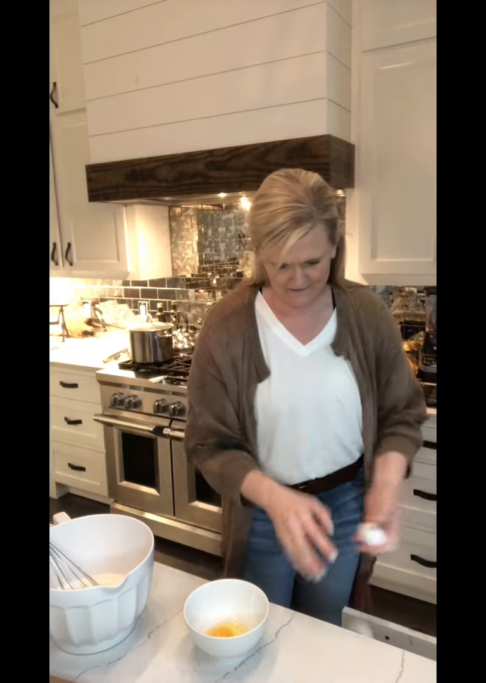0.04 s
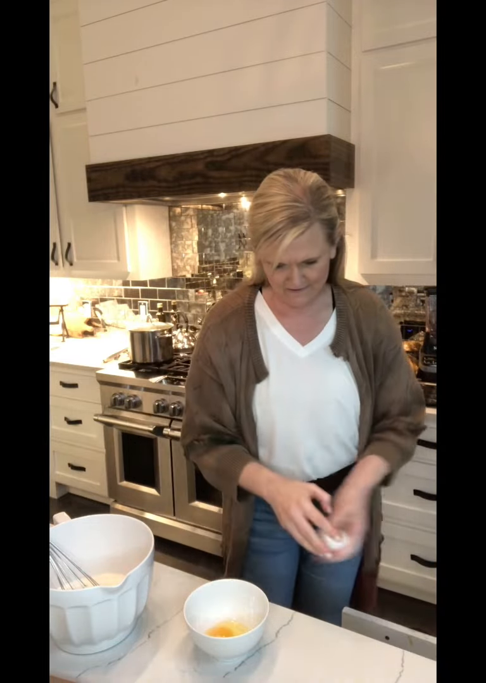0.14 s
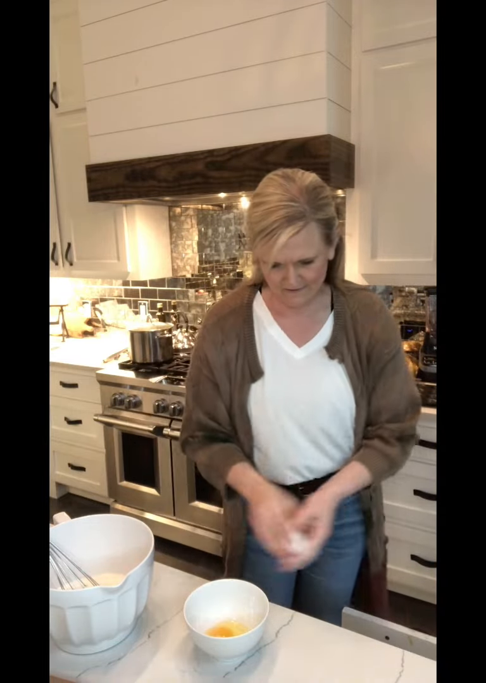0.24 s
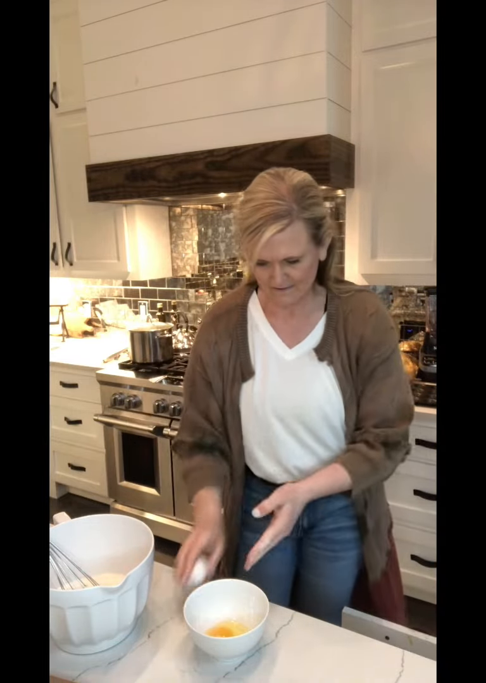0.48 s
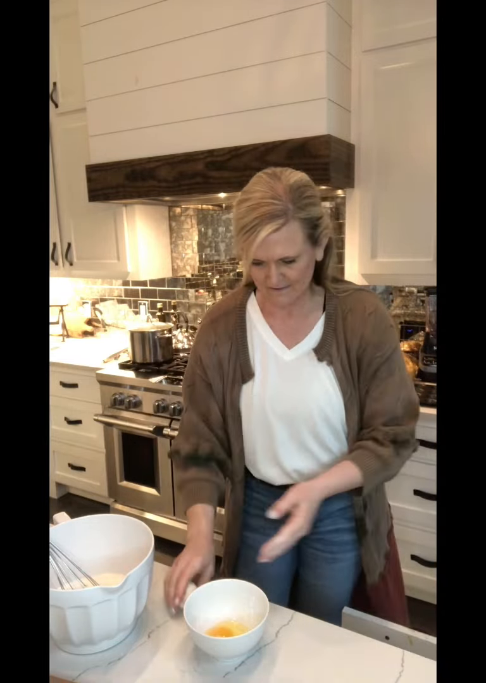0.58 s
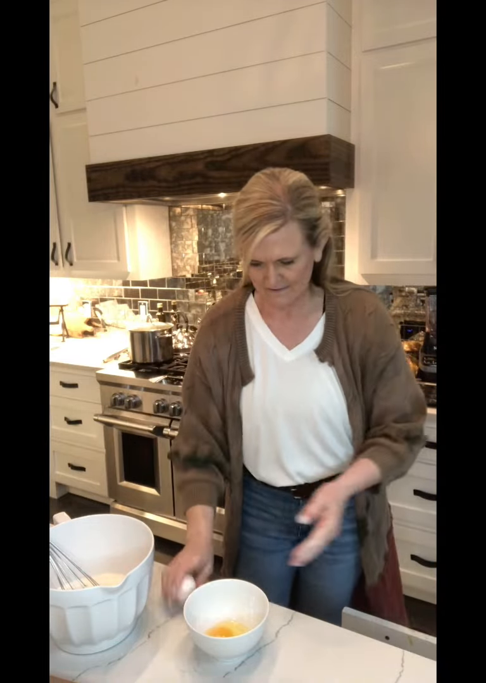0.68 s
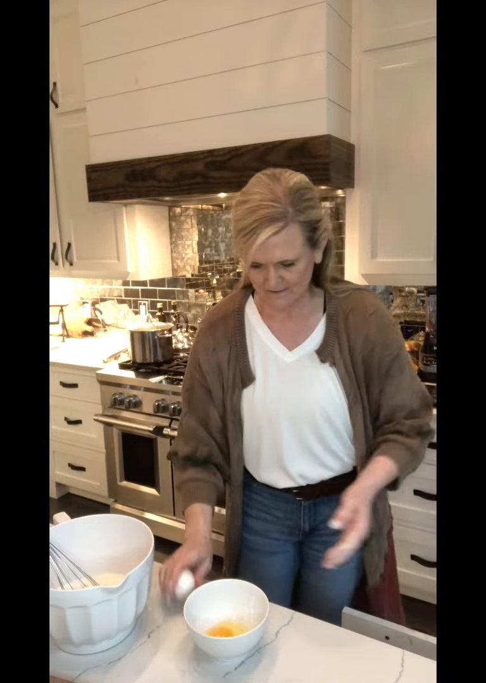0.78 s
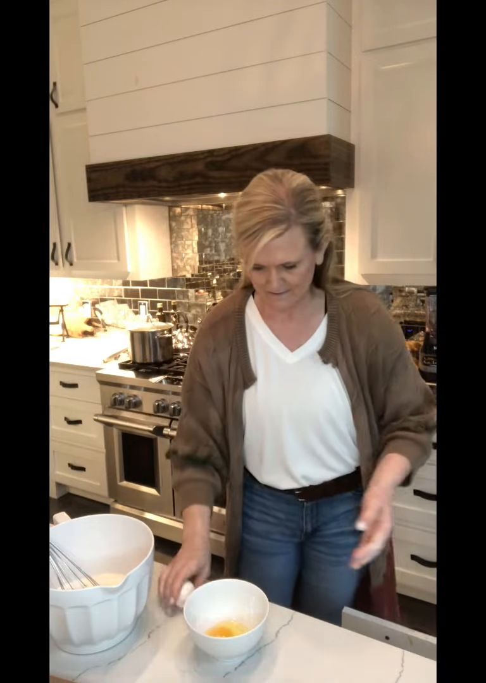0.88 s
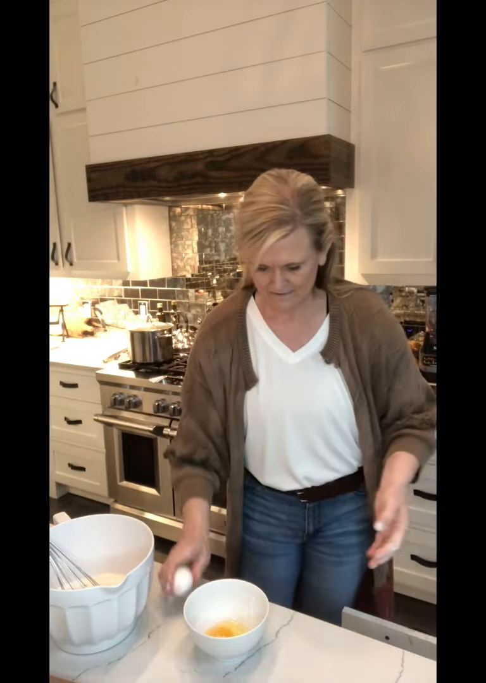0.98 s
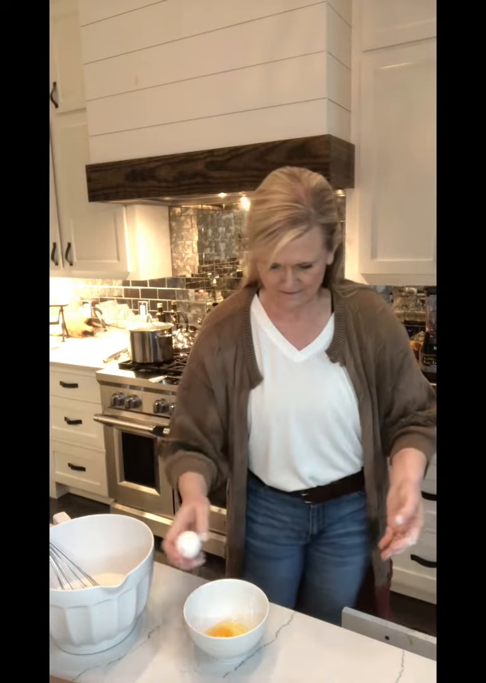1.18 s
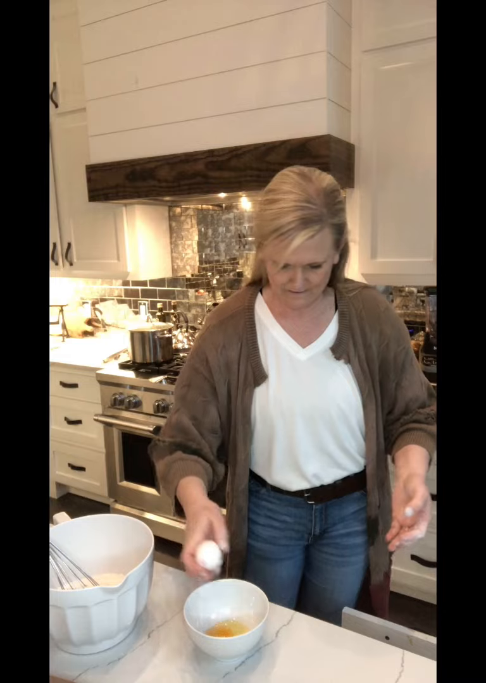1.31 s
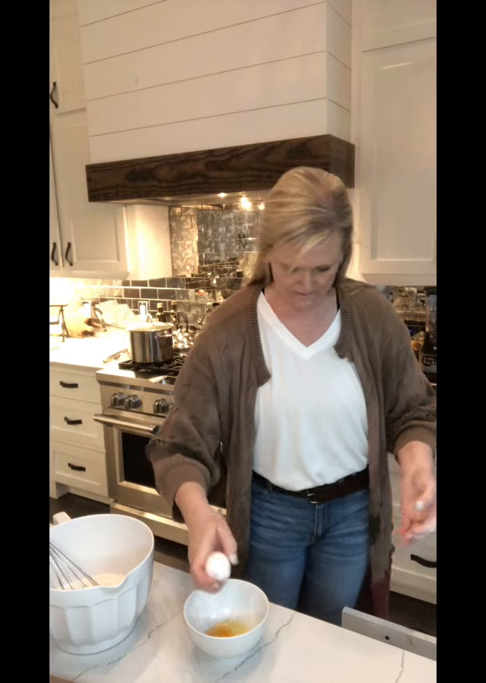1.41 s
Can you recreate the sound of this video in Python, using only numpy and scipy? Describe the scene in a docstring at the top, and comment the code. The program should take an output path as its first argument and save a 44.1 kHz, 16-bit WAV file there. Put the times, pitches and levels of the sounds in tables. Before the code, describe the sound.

An egg slaps into a palm, raps a hard counter, then cracks under two sharper blows

```python
"""An egg slides from one hand into the other with two soft slaps, is knocked once on a kitchen counter
without breaking, then cracks under two sharper blows; the broken shell ticks as it is lifted.
Contacts are brief noise flurries ringing the palm, counter or shell; sliding skin is swelling noise.
Decaying sines make the faint counter boom, and decaying noise the ring of a large, hard kitchen.
A low background rush of coloured noise lies under everything."""
import sys
import numpy as np
from scipy import signal
from scipy.fft import rfft, irfft
from scipy.io import wavfile

SR = 44100
rng = np.random.default_rng(int(sys.argv[2]) if len(sys.argv) > 2 else 0)


def transcribe(signal):
    """Save signal, clipped to [-1, 1], as a 16-bit WAV file at the path in sys.argv[1]."""
    frames = np.atleast_2d(signal).T
    limited = np.clip(frames, -1, 1)
    pcm = np.round(limited * 32767).astype(np.int16)
    wavfile.write(sys.argv[1], SR, pcm)


N = 63945
SIZE = 96000  # samples in every transform, longer than the scene
HZ = np.fft.rfftfreq(SIZE, 1 / SR)
T = np.arange(N) / SR


def amp(db):
    """Decibels to gain."""
    return 10 ** (np.asarray(db) / 20)


def along(points, hz):
    """(frequency, value) points joined by straight lines on a log frequency axis."""
    point_hz, values = np.transpose(points)
    return np.interp(np.log(hz + 1), np.log(point_hz + 1), values)


def filtered(x, response):
    """A sound passed through a frequency response."""
    return irfft(rfft(x, SIZE) * response, SIZE)[:N]


def causal(gain):
    """The minimum-phase response with this gain: its energy comes as early as it can."""
    cepstrum = irfft(np.log(np.maximum(gain, 1e-6)))
    cepstrum[1:SIZE // 2] *= 2
    cepstrum[SIZE // 2 + 1:] = 0
    return np.exp(rfft(cepstrum))


def delay(seconds):
    """Frequency response of a pure delay."""
    return np.exp(-2j * np.pi * HZ * seconds)


def resonances(modes):
    """Gain of a body whose resonances (hz, width_hz, level_db) add in power."""
    skirt = 1.167  # how steeply a resonance falls away from its peak
    power = 0
    for hz, width_hz, level_db in modes:
        damping = (HZ * width_hz) ** 2
        peak = damping / ((hz ** 2 - HZ ** 2) ** 2 + damping)
        power = power + amp(level_db) ** 2 * peak ** skirt
    return np.sqrt(power)


def colour(hollow_db=0, treble_db=0):
    """Gain of two broad bells, each reaching about an octave to either side."""
    hollow_hz, treble_hz = 307, 11800

    def bell(hz):
        return np.exp(-np.log2((HZ + 1) / hz) ** 2)

    return amp(hollow_db * bell(hollow_hz) + treble_db * bell(treble_hz))


def noise(gain):
    """Coloured noise of rms 1."""
    x = filtered(rng.standard_normal(SIZE), gain)
    return x / x.std()


def blurred(gain):
    """A gain evened out over neighbouring pitches, as the room gathers sound from all sides."""
    blur_octaves = .4
    octaves = np.linspace(4, np.log2(SR / 2), 256)
    weights = np.exp(-((octaves[:, None] - octaves) / (blur_octaves / 2)) ** 2)
    power = weights @ np.interp(2 ** octaves, HZ, gain) ** 2 / weights.sum(axis=1)
    return np.sqrt(np.interp(HZ, 2 ** octaves, power))


def contact(start_s, length_s, gain, room_db, build_up_s=1 / SR):
    """A quickly dying flurry of tiny impulses rings a body: (direct sound, sound sent into the room)."""
    smear_s = .002  # widens every contact, added to its length as root of squares
    notch_fill = 0.42  # keeps the flurry's spectrum roughly level without making it ring
    bass_lag_cycles, bass_lag_hz = 0.898, 91.8
    t = T[:SR // 10]
    decay = np.exp(-(t / np.hypot(length_s, smear_s)) ** 2)
    build_up = 1 - np.exp(-(t / build_up_s) ** 2)
    flurry = rng.standard_normal(len(t)) * decay * build_up
    force = rfft(flurry / np.linalg.norm(flurry), SIZE)
    force = force / causal(np.hypot(np.abs(force), notch_fill))
    force = force / np.sqrt(np.mean(np.abs(force) ** 2))
    # low tones build up later: each frequency waits cycles / (hz + lag hz) seconds
    lag = np.exp(-2j * np.pi * bass_lag_cycles * np.log(1 + HZ / bass_lag_hz))
    force = force * lag * delay(start_s)
    direct = causal(gain)
    sent = causal(blurred(gain) * amp(room_db))
    return irfft(force * np.array([direct, sent]))[:, :N]


def kitchen(x):
    """The room's answer: a short burst from near walls and a long diffuse tail, both decaying noise."""
    # how long the tail takes to fall 60 dB: hz, t60_s
    decay_times = [(100, 1.15), (300, 0.68), (1000, 1.24), (4500, 1.1), (8000, 0.76), (14000, .5)]
    # strength of the tail: hz, level_db
    tail_levels = [(100, -15.5), (250, -3), (600, -2.5), (1300, -7), (4500, -7.5), (8000, -9), (14000, -12)]
    tail_delay_s = .007
    early_delay_s, early_t60_s, early_db = .014, 0.035, -13.5
    hz, t, bands = signal.stft(rng.standard_normal(N), SR, nperseg=256)
    t60 = along(decay_times, hz)[:, None]
    level = np.sqrt(np.log(1e6) / (t60 * SR))  # evens the energy of long and short decays
    tail = signal.istft(bands * amp(-60 * t / t60) * level, SR, nperseg=256)[1]
    late = rfft(tail, SIZE) * amp(along(tail_levels, HZ)) * delay(tail_delay_s)
    burst = rng.standard_normal(N) * 1000 ** (-T / early_t60_s)
    burst = burst / np.linalg.norm(burst)
    early = amp(early_db) * rfft(burst, SIZE) * delay(early_delay_s)
    return filtered(x, late + early)


def heard(pair):
    """Direct sound plus the room's answer."""
    direct, sent = pair
    return direct + kitchen(sent)


def background():
    """A steady low rush: noise weighted towards the bass."""
    # spectrum of the rush: hz, relative level_db per Hz
    rush_spectrum = [(25, -13), (50, -11.5), (80, 0), (130, -1.5), (250, 0), (450, -1.5), (800, -8.5),
                     (1500, -15), (3000, -22.5), (8000, -28), (16000, -36)]
    rush_db = -61
    return amp(rush_db) * noise(amp(along(rush_spectrum, HZ)))


def hands():
    """Skin brushes the shell as swelling noise, and the egg slaps into the resonant cupped palm."""
    # egg landing in the palm: start_s, level_db, length_s (before smear), hollow_db, treble_db
    landings = [(0.1543, -6.5, 0.00875, 3.5, -7.5), (0.2161, -0.5, 0.0074, -2.5, -0.5)]
    # cupped hand around the egg: hz, width_hz, level_db
    palm_modes = [(161.3, 16, 20), (233, 21.5, 22.5), (397, 110, 2.5), (640, 360, 6), (1047, 81, 5.5),
                  (1220, 140, 11), (1916, 120, 5), (3980, 340, -4.5), (4780, 600, -6.5), (6170, 1170, -7.5),
                  (12000, 3300, -21)]
    # skin sliding on shell: peak_s, level_db, rise_s, fall_s, treble_db
    rubs = [(0.114, -55, 0.023, 0.025, 3), (0.147, -55, 0.039, 0.085, 8.5),
            (0.224, -49, 0.0018, 0.02, 14.5), (0.27, -56.5, 0.0065, 0.06, 7),
            (1.34, -66.5, 0.0096, 0.012, 23)]
    # spectrum of skin on shell, before each rub's treble: hz, relative level_db per Hz
    skin_spectrum = [(60, -54), (220, 11.5), (500, -10.5), (1600, 1), (2600, -1), (4500, -6.5), (8000, -15),
                     (16000, -35)]
    room_db, build_up_s = 1, .0015  # for the slaps
    palm = resonances(palm_modes)
    pair = np.zeros((2, N))
    for start_s, level_db, length_s, hollow_db, treble_db in landings:
        gain = amp(level_db) * palm * colour(hollow_db, treble_db)
        pair += contact(start_s, length_s, gain, room_db, build_up_s)
    for peak_s, level_db, rise_s, fall_s, treble_db in rubs:
        swell = np.exp(-((T - peak_s) / np.where(T < peak_s, rise_s, fall_s)) ** 2)
        brush = noise(amp(along(skin_spectrum, HZ)) * colour(treble_db=treble_db))
        pair += amp(level_db) * swell * brush  # equally direct and into the room
    return heard(pair)


def knock():
    """The whole egg raps the counter and rings the modes of both."""
    # knock that leaves the shell whole: start_s, level_db, length_s (before smear)
    rap = (.4663, 0, 0.00067)
    # counter and whole egg: hz, width_hz, level_db
    counter_modes = [(184, 68, 7.5), (264, 21, 21), (364, 28, 19.5), (511, 20, 12), (650, 48, 14),
                     (930, 65, 6), (1186, 56, 3.5), (1510, 110, 1), (2420, 20, -6), (4020, 300, -6),
                     (4950, 160, -2.5), (7100, 440, -9.5)]
    # sent into the room, as the counter spreads its low tones widely: hz, level_db
    room_levels = [(200, 1.5), (600, 1), (1200, 0.5), (2500, 1), (5000, -4), (12000, -3.5)]
    start_s, level_db, length_s = rap
    gain = amp(level_db) * resonances(counter_modes)
    return heard(contact(start_s, length_s, gain, along(room_levels, HZ)))


def cabinet():
    """Each blow slowly wakes the low modes under the counter, which decay as sines."""
    # cabinet boom: hz, level_db, t60_s
    boom_modes = [(69.1, 0, 0.66), (77.4, -6, 0.64), (96.6, 0.5, 0.48)]
    # blows that drive it: start_s, level_db
    drives = [(.468, -51.5), (0.615, -56), (0.784, -47.5)]
    rise_s = 0.011
    out = np.zeros(N)
    for start_s, drive_db in drives:
        t = np.maximum(T - start_s, 0)
        rise = 1 - np.exp(-(t / rise_s) ** 2)
        for hz, level_db, t60_s in boom_modes:
            ring = 1000 ** (-t / t60_s) * np.sin(2 * np.pi * hz * t)
            out += amp(drive_db) * amp(level_db) * ring * rise
    return out


def cracks():
    """The shell caves in within a few milliseconds; once dented, it favours other modes."""
    # blows that break the shell: start_s, level_db, length_s (before smear), build_up_s, room_db
    blows = [(.6121, 0, 0.0025, 0.00027, -2.5), (.7792, -0.5, 0.0022, 0.00122, -2)]
    # breaking shell against the counter: hz, width_hz, first_blow_db, second_blow_db
    shell_modes = [(247.5, 105, 13.5, 9.5), (410, 105, 8, 1.5), (608, 78, -2, 7), (766, 200, -8, 4.5),
                   (992, 100, 12.5, 5), (1305, 220, 11.5, 1), (1990, 220, 9.5, 6), (2600, 85, 8.5, 11.5),
                   (3028, 290, 4.5, 5), (3900, 210, 5.5, 7.5), (4460, 130, 7.5, 8.5), (4770, 320, 8, 2.5),
                   (5060, 200, 4, -16), (5870, 180, 6.5, 5.5), (6370, 260, 1.5, 4), (7620, 870, 0, -1),
                   (10800, 1500, -8, -9), (12270, 350, -4.5, 1), (14800, 1000, -6, -6)]
    out = np.zeros(N)
    for blow, (start_s, level_db, length_s, build_up_s, room_db) in enumerate(blows):
        shell = resonances([(hz, width_hz, levels[blow]) for hz, width_hz, *levels in shell_modes])
        out += heard(contact(start_s, length_s, amp(level_db) * shell, room_db, build_up_s))
    return out


def ticks():
    """Bits of broken shell snap under the fingers, each piece ringing at its own pitch."""
    # small fractures in the lifted shell:
    # start_s, level_db, length_s (before smear), treble_db, pitch_hz of the piece, ring_db
    fractures = [(1.1126, -22.5, 0.0015, 7, 8140, -2), (1.1305, -18, 0.0054, 7, 2300, -6),
                 (1.134, -17.5, .002, 4, 3830, 1.5), (1.2293, -4, 0.0024, 3, 4300, -7.5),
                 (1.2313, -5, .002, 5.5, 4920, -4.5), (1.247, -5, 0.0012, 2, 5850, -9.5),
                 (1.254, -20, .001, 0, 4270, -8), (1.2662, -23.5, 0.0013, -7, 3760, 0),
                 (1.2747, -20.5, 0.0022, 11, 9000, -8), (1.4127, -16.5, 0.0017, -3, 2060, -4.5)]
    # loose shell pieces: hz, width_hz, level_db
    flake_modes = [(1460, 890, -21.5), (2240, 200, -12), (3600, 930, -18), (4300, 260, -11.5),
                   (4900, 320, -8), (6100, 1300, -18), (9800, 1900, -23), (13200, 1600, -27)]
    piece_q = 10.8  # pitch of a piece over the width of its resonance
    room_db = -4.5
    flake = resonances(flake_modes)
    pair = np.zeros((2, N))
    for start_s, level_db, length_s, treble_db, pitch_hz, ring_db in fractures:
        ring = resonances([(pitch_hz, pitch_hz / piece_q, ring_db)])
        piece = np.hypot(flake * colour(treble_db=treble_db), ring)
        pair += contact(start_s, length_s, amp(level_db) * piece, room_db)
    return heard(pair)


def scene():
    """All sources over the kitchen's background."""
    return (background() + hands() + knock() + cabinet() + cracks() + ticks())[None]


def record(dry):
    """The microphone drops the deepest bass and keeps nothing above its band limit."""
    low_cut_hz, top_hz, top_slope_hz = 25, 16250, 500
    low_cut = (1j * HZ / (low_cut_hz + 1j * HZ)) ** 2
    top_cut = np.clip((top_hz - HZ) / top_slope_hz, 0, 1)
    return filtered(dry[0], low_cut * top_cut)[None]


dry = scene()
out = record(dry)
transcribe(out)
```